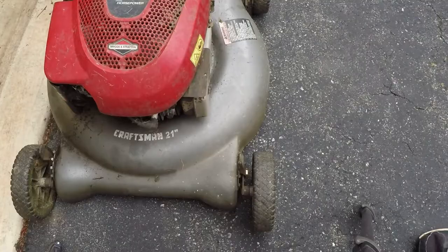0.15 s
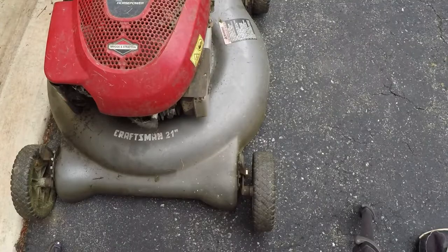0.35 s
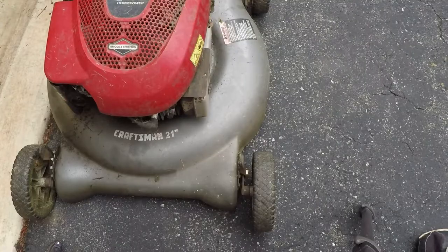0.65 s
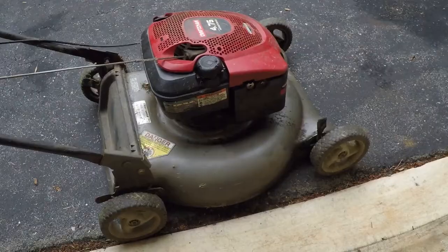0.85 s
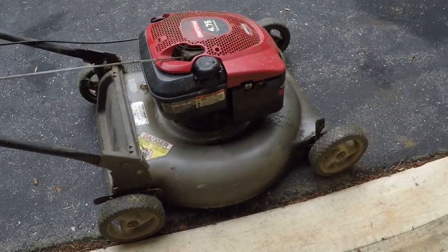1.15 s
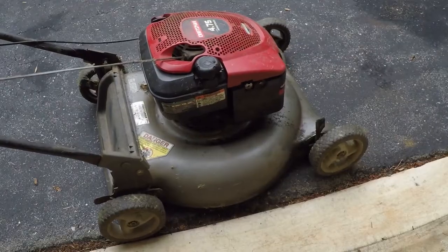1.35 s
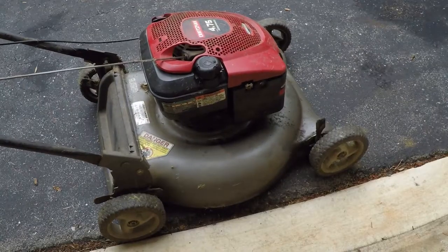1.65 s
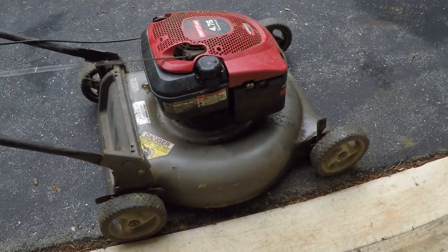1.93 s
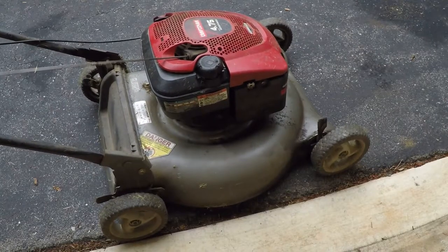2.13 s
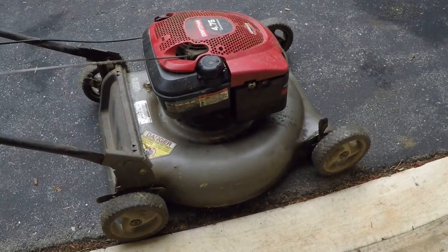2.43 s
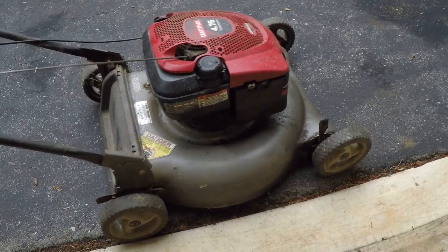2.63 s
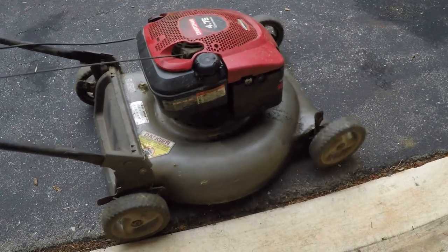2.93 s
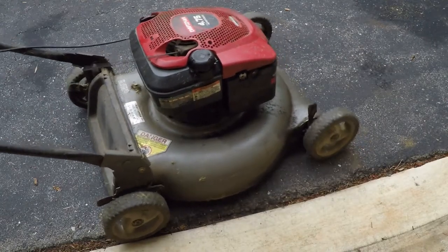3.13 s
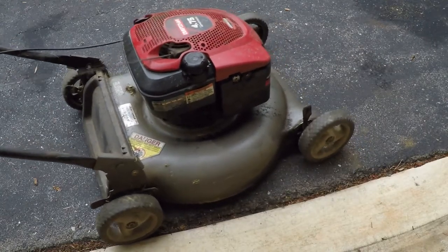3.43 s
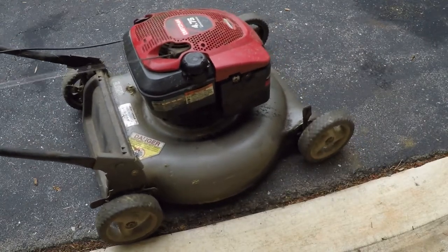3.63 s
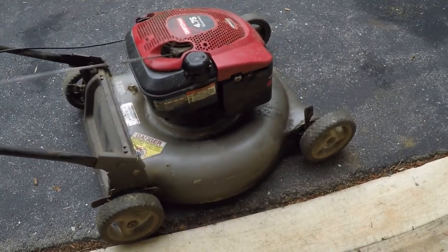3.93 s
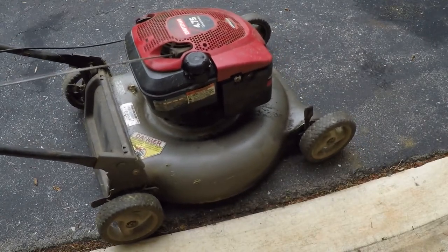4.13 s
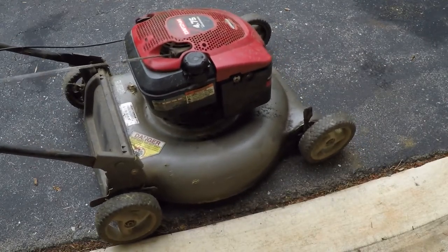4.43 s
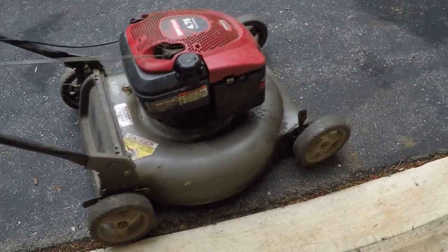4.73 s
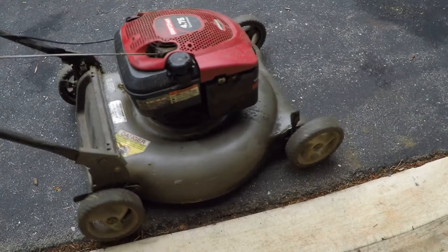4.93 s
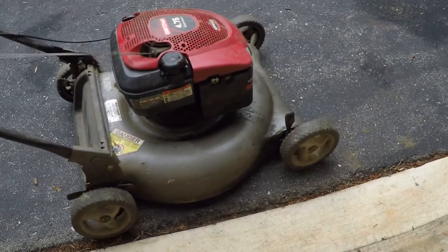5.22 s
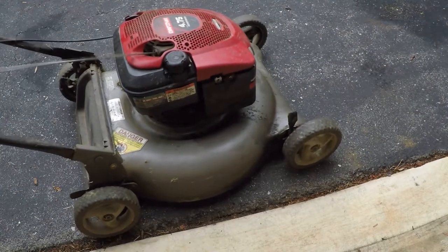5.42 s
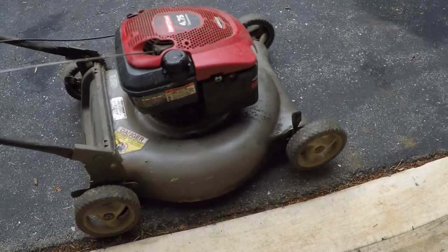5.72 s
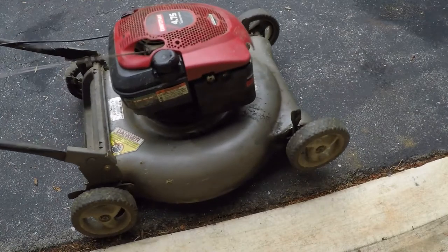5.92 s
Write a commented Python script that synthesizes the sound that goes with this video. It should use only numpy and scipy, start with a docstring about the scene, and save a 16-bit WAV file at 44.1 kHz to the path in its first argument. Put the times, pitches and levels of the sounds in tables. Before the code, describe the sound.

Quiet outdoor handling noises and a ringing metal clack, then a cord pull, a thud and squeal, and a single-cylinder lawn mower roaring at constant speed.

```python
"""A petrol lawn mower on a driveway, close by: first a rumbling wash of air (shaped noise) that stops short.
Knocks, rubs and faint murmurs (noise) surround the snap of the safety lever, whose handle rings as fading sines.
The starter cord is taken up and pulled: pawls tick, the deck hums, the first charge fires, the clutch squeals.
The single cylinder catches and runs up to its full speed: exhaust beat (sines locked to the crank),
valve clatter, blade rush and a ringing steel deck (noise). Near the end the microphone drifts away from the exhaust."""
import sys
import numpy as np
from scipy import signal
from scipy.fft import rfft, irfft
from scipy.io import wavfile

SR = 44100
rng = np.random.default_rng(int(sys.argv[2]) if len(sys.argv) > 2 else 0)


def to_wav(sig):
    """Store sig (one row per channel, or 1-D mono) as 16-bit WAV at the path in sys.argv[1].

    Samples outside -1..1 are clipped; the rate is SR.
    """
    pcm = np.clip(np.atleast_2d(sig), -1, 1) * 32767
    pcm = np.round(pcm).astype(np.int16)
    wavfile.write(sys.argv[1], SR, pcm.T)  # frames by channels


N = 267687
TIME = np.arange(N) / SR  # seconds

# Speed of the engine in four-stroke cycles: time_s, cycles_per_s
SPEED = [(2.5, 2), (3.0, 6.4), (3.3, 16.4), (3.6, 25.3), (3.7, 27), (3.85, 26.55), (4.15, 27.1),
         (4.75, 26.7), (5.2, 27), (6.07, 26.9)]
# stages of the start (s): the cord is pulled, the first charge fires, the engine catches
PULL_S, FIRST_FIRE_S, CATCH_S = 2.6, 2.868, 3.105


def amp(db):
    """Turns decibels into gain."""
    return 10 ** (np.asarray(db) / 20)


def evened(x):
    """Scales a sound to an average (rms) level of 1."""
    return x / np.sqrt(np.mean(x ** 2) + 1e-20)


def curve(rows, axis=1, at=TIME):
    """Reads one column of a table, its points joined by straight lines."""
    rows = np.asarray(rows, float)
    return np.interp(at, rows[:, 0], rows[:, axis])


def white():
    """White noise: all pitches equally strong."""
    return rng.standard_normal(N)


def wander(rate):
    """Smooth random ups and downs, with a new random point this many times a second."""
    knots = rng.standard_normal(4096)
    return np.interp(TIME * rate, np.arange(len(knots)), knots)


def colour(x, points, ripple_db=0, ripple_hz=130):
    """Filters a sound by a spectrum, at rms 1; random ripple stands for many small casing resonances."""
    hz, db = np.transpose(points)
    bins = np.fft.rfftfreq(N, 1 / SR)
    ripple = np.interp(bins / ripple_hz, np.arange(1024), rng.standard_normal(1024))
    smooth_db = np.interp(np.log(bins + 1), np.log(hz + 1), db)
    return evened(irfft(rfft(x) * amp(smooth_db + ripple_db * ripple), N))


def band(hz, octaves):
    """Noise in a soft band around one pitch, at rms 1."""
    bins = np.fft.rfftfreq(N, 1 / SR) + 1
    shape = np.exp(-.5 * (np.log2(bins / hz) / octaves) ** 2)
    return evened(irfft(rfft(white()) * shape, N))


def resonate(x, hz, width_hz):
    """A steep resonance, made by filtering twice, at rms 1; the width is that of one pass."""
    b, a = signal.iirpeak(hz, hz / width_hz, SR)
    once = signal.lfilter(b, a, x)
    return evened(signal.lfilter(b, a, once))


def dying(s, t60, rise=0.00122):
    """Loudness of a blow at time s: a quick rise, and a fade that drops 60 dB in t60 seconds."""
    age = np.maximum(TIME - s, 0)
    fade = np.exp(-np.minimum(np.log(1000) * age / t60, 20))
    return np.minimum(age / rise, 1) * fade


def since(s, rise_s):
    """Rises from 0 to 1, starting at time s."""
    return np.clip((TIME - s) / rise_s, 0, 1)


def crank(exhaust_at_s=3.448):
    """Cycles the crank has turned, counted from one exhaust stroke."""
    turns = np.cumsum(curve(SPEED)) / SR
    return turns - np.interp(exhaust_at_s, TIME, turns)


def pace():
    """Engine speed as a share of full speed."""
    return curve(SPEED) / SPEED[-1][1]


def throttle(ease_s=3.53, ease_takes_s=0.24):
    """1 while wide open; eased to 0 from a set time, as the run-up ends."""
    return 1 - since(ease_s, ease_takes_s)


def effort(knee_pace=0.21, steepness=5.1):
    """Mechanical noise grows steeply as the crank starts to turn, then levels off."""
    return since(PULL_S, 0.026) / (1 + (knee_pace / pace()) ** steepness)


def stroke_depth(steady=0.19, straining=1.43):
    """Once the engine has caught, its strokes are harder the further it is below full speed."""
    return steady + straining * since(CATCH_S, 0.09) * (1 - pace())


def drift(db, start_s=5.45, takes_s=0.67):
    """Level change (dB) as the microphone drifts away from the exhaust, towards cowl and deck."""
    return db * since(start_s, takes_s)


def outdoors(ends_s=0.816, wash_db=-34, air_db=-44.5, gust_db=2.0):
    """Quiet outdoor air, with a louder rumbling, faintly whistling wash that stops short near the start."""
    # Spectra of the wash and of the quiet air: pitch_hz, level_db (per Hz)
    wash_spectrum = [(12, -29), (20, -1), (72, 0), (105, -7.5), (207, -14.5), (300, -22), (400, -20.5),
                     (834, -29.5), (1300, -35.5), (1600, -35.5), (2000, -39), (4200, -42), (5500, -46),
                     (7800, -50), (15500, -53)]
    air_spectrum = [(12, -25), (25, -2), (90, -9), (145, -21), (210, -18.5), (300, -28.5), (505, -29),
                    (1200, -38), (2270, -45), (6500, -48), (7800, -47), (9500, -51.5), (15500, -58)]
    # Faint whistles in the wash: pitch_hz, width_hz, level_db
    whistles = [(4680, 450, -65.5), (8550, 760, -67)]
    wash = amp(wash_db + gust_db * wander(13.5)) * colour(white(), wash_spectrum)
    wash += sum(amp(db) * resonate(white(), hz, width) for hz, width, db in whistles)
    stop = np.clip((ends_s - TIME) / 0.018, 0, 1)
    return wash * stop + amp(air_db) * colour(white(), air_spectrum)


def rubs_and_murmurs(grain_db=2.0, skew=0.56):
    """Rubs, a faint murmur and a faint high chirr: grainy noise that swells quickly and fades."""
    # Swells of noise: start_s, length_s, level_db, centre_hz, width_octaves
    swells = [(0.84, 0.097, -56, 1800, 1.6), (0.971, 0.13, -47.5, 2510, .9),
              (1.72, 0.22, -64.5, 3600, 0.41), (1.944, 0.088, -36, 2320, .95),
              (2.036, 0.37, -59.5, 796, 0.92), (2.194, 0.27, -67, 7800, .1)]
    out = np.zeros(N)
    for s, length, db, centre_hz, octaves in swells:
        swell = np.sin(np.pi * since(s, length) ** skew)
        out += amp(db) * swell * band(centre_hz, octaves)
    return out * amp(grain_db * wander(300))


def knocks(tail_db=-27, tail_t60=0.26):
    """Knocks, the first only a dying tail: short noise bursts, each with its own colour and a faint echoing tail."""
    # Bursts: start_s, level_db, t60_s, centre_hz, width_octaves
    bursts = [(0, -36.5, 0.45, 1300, 1.36), (.926, -44.5, 0.43, 620, .58), (1.621, -48.5, .08, 1400, 1.2),
              (1.879, -33.5, 0.14, 1700, 1.4), (1.966, -38, 0.24, 483, 1.1), (2.031, -26, 0.17, 583, 2.23),
              (2.523, -48.5, 0.29, 487, 0.94), (2.585, -35, 0.11, 700, 3)]
    out, t = np.zeros(N + SR), np.arange(SR // 2) / SR
    hz = np.fft.rfftfreq(len(t), 1 / SR) + 1
    for s, db, t60, centre_hz, octaves in bursts:
        shape = np.exp(-.5 * (np.log2(hz / centre_hz) / octaves) ** 2)
        burst = evened(irfft(rfft(rng.standard_normal(len(t))) * shape, len(t)))
        fade = np.exp(-np.log(1000) * t / t60)
        fade += amp(tail_db) * np.exp(-np.log(1000) * t / tail_t60)
        attack = np.minimum(t / 0.00069, 1)
        out[max(round(s * SR), 0):][:len(t)] += amp(db) * burst * fade * attack
    return out[:N]


def frame(blows, ring_db=-9):
    """The frame's own pitches ring with all these noises: fading sines are added to each."""
    # What the frame rings with: pitch_hz, level_db (relative), t60_s
    frame_modes = [(205, -7, .15), (480, -4, .16), (800, -8, .06), (1700, -5, .04), (2460, -2, .045),
                   (3280, -5, .05), (4050, -4, .04), (5950, -8, .05)]
    t = np.arange(SR // 2) / SR
    ring = sum(amp(db) * np.exp(-np.log(1000) * t / t60) * np.sin(2 * np.pi * hz * t)
               for hz, db, t60 in frame_modes)
    return blows + amp(ring_db) * signal.oaconvolve(blows, ring / np.linalg.norm(ring))[:N]


def lever(s=1.0135, crack_db=-7, crack_t60=0.16, thud_db=-21, thud_t60=0.2, tail_db=-27, tail_t60=0.59,
          deck_hz=474, deck_db=-33, deck_t60=.8, handle_db=-24):
    """The lever snaps on the tube: a crack, a thud, deck and handle ringing, and a tail echoing off the house."""
    # Spectra of the blow and of its echo off the house: pitch_hz, level_db (per Hz)
    snap_spectrum = [(59, -51), (100, -11.5), (228, 0), (362, -18), (601, -11.5), (956, -8.5),
                     (1060, -19.5), (1800, -13), (2520, -5.5), (3320, -12), (3850, -3), (7410, -13.5),
                     (9740, 0.5), (14200, -7), (15500, -27)]
    echo_spectrum = [(100, -0.5), (220, 10), (600, -0.5), (1500, -5), (4500, 1.5), (8200, -5), (9600, 3),
                     (12000, -6), (15300, -8)]
    # Ringing pitches of the tubular handle: pitch_hz, level_db (relative), t60_s
    handle_modes = [(205, -1, .22), (483, -16, 1.1), (1244, -17, .38), (1997, -14, .19), (4452, -10, .18),
                    (9077, 0, .3), (9365, 2, .2), (9520, 4, .3), (10025, -2, .27), (10920, -14, .28),
                    (11510, -16, .38), (14830, -18, .3)]
    age = TIME - s
    crack = amp(crack_db) * dying(s, crack_t60) * colour(white(), snap_spectrum)
    thud = amp(thud_db) * dying(s, thud_t60, rise=0.0079) * resonate(white(), 600, 390)
    hum = amp(deck_db) * dying(s, deck_t60, rise=0.011) * np.sin(2 * np.pi * deck_hz * age)
    echo = amp(tail_db) * dying(s, tail_t60) * colour(white(), echo_spectrum, ripple_db=0.5)
    ring = sum(amp(db) * dying(s, t60) * np.sin(2 * np.pi * hz * age) for hz, db, t60 in handle_modes)
    return crack + thud + hum + echo + amp(handle_db) * ring


def cord(whir_per_cycle=325, whir_db=-39, width_hz=170, scrape_hz=3050, scrape_width_hz=1400,
         scrape_db=-44, rub_db=-38, taut_s=2.63, reel_s=2.712, slack_s=2.95):
    """The cord scrapes through its guide; then the reel rubs, and whirs higher with the crank's speed."""
    whir_turns = np.cumsum(whir_per_cycle * curve(SPEED)) / SR
    whir = evened(wander(2 * width_hz)) * np.cos(2 * np.pi * whir_turns) * np.sqrt(2)
    scrape = amp(scrape_db) * resonate(white(), scrape_hz, scrape_width_hz)
    rub = amp(rub_db) * band(hz=870, octaves=.35)
    pulling = since(taut_s, 0.016) * (1 - since(reel_s, 0.044))
    reeling = since(reel_s, 0.012) * (1 - since(slack_s, 0.059))
    return pulling * scrape + reeling * (amp(whir_db) * whir + rub)


def tugs(hum_hz=478, edge_s=0.02, rough=0.47, wobble_hz=8):
    """The deck hums while the cord is under strain: a sine with wavering pitch and level."""
    # Tugs on the cord: start_s, length_s, level_db
    pulls = [(2.627, 0.12, -28), (2.778, 0.055, -25)]
    strain = sum(amp(db) * (since(s, edge_s) - since(s + length - edge_s / 2, edge_s))
                 for s, length, db in pulls)
    hum_turns = np.cumsum(hum_hz + wobble_hz * wander(60)) / SR
    return strain * evened((1 + rough * wander(98)) * np.cos(2 * np.pi * hum_turns))


def pawls(first_s=2.664, last_s=2.712, tick_db=-32, tick_t60=0.047, bite_db=-23, bite_t60=.028, count=5):
    """The starter pawls tick over their ratchet and bite on the last tooth: short bursts of noise."""
    tick_times = np.linspace(first_s, last_s, count)[:-1]  # the last tooth is the bite
    ticks = amp(tick_db) * sum(dying(s, tick_t60) for s in tick_times) * band(hz=4500, octaves=1.0)
    bite = amp(bite_db) * dying(last_s, bite_t60) * band(hz=3320, octaves=0.45)
    return ticks + bite


def first_fire(thud_db=-12, thud_t60=0.13, thud_rise_s=0.04, clank_db=-21, clank_t60=0.084,
               spit_db=-18, spit_t60=0.13, spit_after_s=.027):
    """The first charge fires with a thud and a clank; then the exhaust spits, all as bands of noise."""
    thud = amp(thud_db) * dying(FIRST_FIRE_S, thud_t60, rise=thud_rise_s) * band(hz=240, octaves=0.56)
    clank = amp(clank_db) * dying(FIRST_FIRE_S, clank_t60) * band(hz=2720, octaves=0.43)
    spit = amp(spit_db) * dying(FIRST_FIRE_S + spit_after_s, spit_t60) * band(hz=9000, octaves=2.1)
    return thud + clank + spit


def clutch(rasp_db=-3):
    """The starter clutch slips, faintly as the cord is taken up, then as the engine overruns it: squeal and rasp."""
    # Slips of the clutch: start_s, level_db, t60_s, overtones_db (relative)
    slips = [(1.996, -39, 0.11, -23), (2.994, -20, 0.033, -14), (3.022, -19, 0.21, -26),
             (3.044, -25, 0.11, 5)]
    # Its main note, then its overtones: pitch_hz, width_hz, level_db (relative)
    squeal_notes = [(5890, 120, 1), (5580, 120, -10), (7280, 380, 1), (10880, 630, -1)]
    note, *overtones = [amp(db) * resonate(white(), hz, width) for hz, width, db in squeal_notes]
    squeal = note + amp(rasp_db) * band(hz=3120, octaves=0.69)
    bright = sum(overtones)
    return sum(amp(db) * dying(s, t60, rise=0.0015) * (squeal + amp(bright_db) * bright)
               for s, db, t60, bright_db in slips)


def deck(ring_hz=478, width_hz=45, cranked_db=-41, churn_db=-22, open_churn_db=1, ring_db=-33,
         open_ring_db=8, buffet_db=-24, flutter_db=2):
    """The blade churns air under the ringing steel deck, and buffets while it gathers speed: all from noise."""
    # Spectrum of the churned air: pitch_hz, level_db (per Hz)
    rumble_spectrum = [(20, -41), (45, -13.5), (100, -3.5), (170, -7.5), (225, 6), (300, 0.5), (380, -9.5),
                       (450, 4.5), (600, -2), (800, -13.5), (2000, -47)]
    fired = since(FIRST_FIRE_S, 0.0052)
    churn = amp(cranked_db) * since(PULL_S, 0.0091)
    churn += fired * amp(churn_db + open_churn_db * throttle())
    ring = fired * amp(ring_db + open_ring_db * throttle() + drift(db=9))
    buffet = amp(buffet_db) * since(CATCH_S, .25) * throttle() * band(hz=85, octaves=.6)
    rush = churn * colour(white(), rumble_spectrum) + ring * resonate(white(), ring_hz, width_hz)
    return amp(flutter_db * wander(22)) * rush + buffet


def cowl(turns, strikes_at=.37, rattle_db=-37, open_db=12):
    """Once a cycle the valve gear jolts the cowl, whose buzz dies away; hardest at open throttle."""
    # Ring of the engine's cowl and fins: pitch_hz, width_hz, level_db (relative)
    cowl_modes = [(2700, 970, 2.5), (4540, 1900, -1.5)]
    jolt = np.exp(-((turns - strikes_at) % 1) / .16) * white()
    buzz = sum(amp(db) * resonate(jolt, hz, width) for hz, width, db in cowl_modes)
    level = amp(rattle_db + open_db * throttle() + drift(db=10.5))
    return since(CATCH_S, 0.023) * level * evened(buzz)


def machinery(turns, clatter_db=-20, fizz_db=-29, open_fizz_db=0.0, flutter_db=1.0, ticks_per_s=700,
              tick_size=3, repeating=0.19):
    """Valve clatter and combustion fizz: noise pulsing with the strokes; some clatter is alike in every cycle."""
    # Noise through one cycle, from the exhaust stroke: share_of_cycle, clatter_db, fizz_db (before stroke depth)
    cycle_shape = [(0, 2, -3), (.15, 2, -5.5), (.33, -1, -3), (.39, -20, -7), (.47, 1.5, -1), (.6, -8, -8),
                   (.67, 4.5, 13), (.8, -7, 4), (.9, -5.5, 1.5), (1, 4, 10.5)]
    # Spectra of clatter and fizz: pitch_hz, level_db (per Hz)
    clatter_spectrum = [(320, -10), (550, -7), (750, -3), (1030, -7), (1330, -5), (1560, -8), (1850, -11.5),
                        (2750, -10), (3500, -14), (5000, -20), (6500, -28), (8450, -38.5), (14300, -90)]
    fizz_spectrum = [(3240, -6), (5500, -3.5), (8400, -6.5), (9050, -9.5), (9400, -8), (11500, -7),
                     (14000, -9.5), (15400, -13)]
    load, flutter = stroke_depth(), flutter_db * wander(130)
    struck = rng.random(N) < ticks_per_s / SR
    ticks = tick_size * np.sign(white()) * struck * np.minimum(rng.exponential(1, N), 2)
    # one random pattern, replayed every cycle
    pattern = rng.standard_normal(size=160)
    replayed = np.interp(turns % 1, np.linspace(0, 1, len(pattern)), pattern)
    alike = evened(np.diff(replayed, prepend=pattern[0]))
    clatter = evened(amp(load * curve(cycle_shape, 1, turns % 1) + flutter))
    fizz = evened(amp(load * curve(cycle_shape, 2, turns % 1) + flutter))
    rattling = clatter * (white() + ticks + repeating * alike)
    out = amp(clatter_db) * colour(rattling, clatter_spectrum, ripple_db=-1.5)
    fizz_level = amp(fizz_db + open_fizz_db * throttle())
    out += fizz_level * colour(fizz * (white() + ticks), fizz_spectrum, ripple_db=2.7)
    return effort() * out


def firing(turns, fires_at=.7, kick_fade=.15, thump_db=-38, open_db=18, lag_s=0.095, gasp_t60=0.19,
           gasp_lead_s=0.017):
    """The first strokes push the air one by one; then each firing kicks the crankcase, softer at eased throttle."""
    # First slow strokes, each a push and a gasp of air: middle_s, push_db, half_width_s, gasp_db
    first_strokes = [(2.812, -17.5, 0.0026, -27), (2.949, -21, 0.0027, -21.5), (2.997, -10.5, 0.00285, -24),
                     (3.116, -12, 0.0044, -13.5)]
    out, gasp = np.zeros(N), band(hz=750, octaves=1.75)
    for s, db, half_width, gasp_db in first_strokes:
        u = (TIME - s) / half_width
        out += amp(db) * u * np.exp(np.maximum((1 - u ** 2) / 2, -40))  # a dip, then a peak
        out += amp(gasp_db) * dying(s - gasp_lead_s, gasp_t60, rise=0.0038) * gasp
    kick = np.exp(-((turns - fires_at) % 1) / kick_fade)  # falls to 37 % in this share of a cycle
    thump_spectrum = [(15, -30), (50, -2.0), (90, 6.0), (150, 4.5), (300, 8), (600, 2.5), (1500, -36)]
    thump = colour(kick.mean() - kick, thump_spectrum)
    charge = np.interp(TIME - lag_s, TIME, throttle())  # follows the throttle late
    return out + since(CATCH_S + .03, .04) * amp(thump_db + open_db * charge) * thump


def exhaust(turns, beat_db=-16, drone_db=-15, builds_s=0.2, shake=0.027, shake_per_order=0.018,
            swell_power=1.2, crank_jitter=.0018):
    """Low orders line up in one puff a cycle; the higher ones, from blade and deck, swell with speed."""
    # Sines at multiples of the cycle rate, at full speed: multiple, level_db (relative)
    order_levels = [(1, 0), (2, 3), (3, -10), (4, -6.5), (5, 2), (6, -10.5), (7, -12), (8, -1), (9, -11.5),
                    (10, -8), (11, -8), (12, -0.5), (13, -14), (14, -14), (15, -30), (16, -3.5), (17, -5.5),
                    (18, 0.5), (19, -5), (20, -9.5), (21, -5.5), (22, -20), (23, -10), (24, -16),
                    (25, -11.5), (26, -19), (27, -15), (28, -19)]
    orders, db = np.transpose(order_levels)
    gains = amp(db) / np.linalg.norm(amp(db)) * np.sqrt(2)
    swell = pace() ** swell_power
    uneven = turns + crank_jitter * wander(25)  # the timing wavers by this share of a cycle
    out = np.zeros(N)
    for k, gain in zip(orders, gains):
        low = k < 7
        offset = rng.random() * (not low)
        level = amp(beat_db) if low else amp(drone_db) * swell
        shaking = 1 + (shake + shake_per_order * k) * wander(18)
        out += gain * level * shaking * np.cos(2 * np.pi * (k * uneven + offset))
    return since(CATCH_S - builds_s / 2, builds_s) * amp(drift(db=-3.0)) * out


def scene():
    """Adds up all sources at one microphone."""
    turns = crank()
    blows = knocks() + rubs_and_murmurs() + pawls() + first_fire()
    starting = lever() + frame(blows) + tugs() + cord() + clutch()
    engine = exhaust(turns) + firing(turns) + machinery(turns) + cowl(turns) + deck()
    return (engine + starting + outdoors())[None]


def record(dry, edge_hz=15450):
    """Rounds off the loudest peaks, then removes what lies above the band edge."""
    rounded = dry / (1 + (dry / .95) ** 8) ** (1 / 8)
    lowpass = signal.firwin(511, edge_hz, window=("kaiser", 9), fs=SR)
    return signal.oaconvolve(rounded, lowpass[None], "same")


dry = scene()
out = record(dry)
to_wav(out)
```